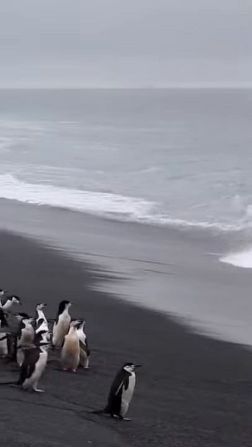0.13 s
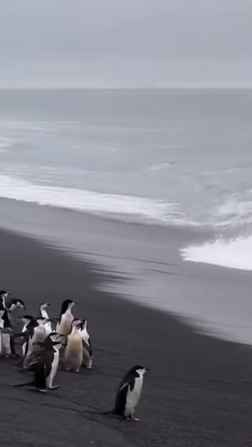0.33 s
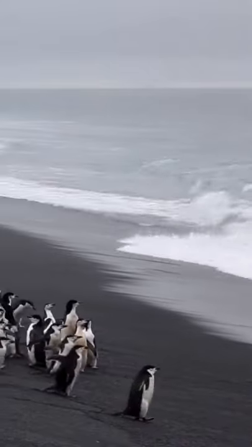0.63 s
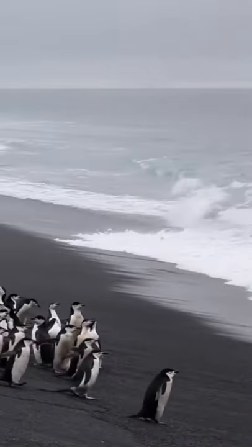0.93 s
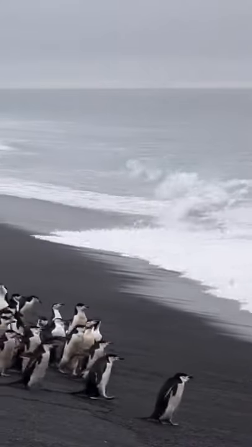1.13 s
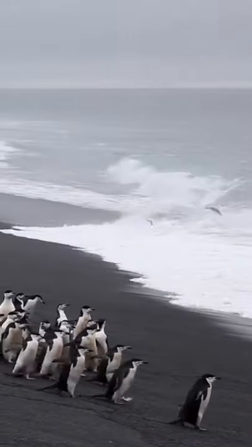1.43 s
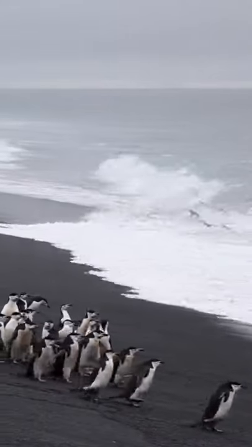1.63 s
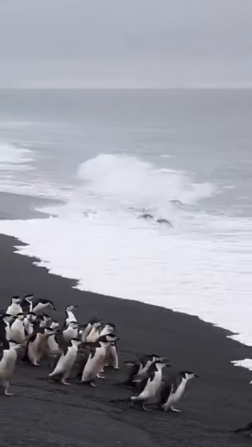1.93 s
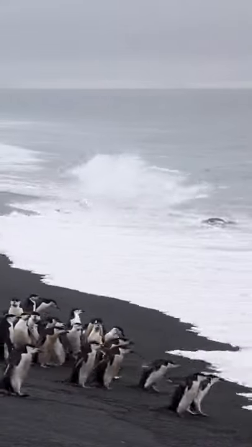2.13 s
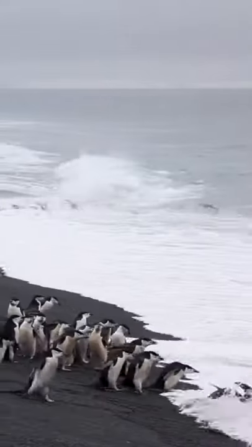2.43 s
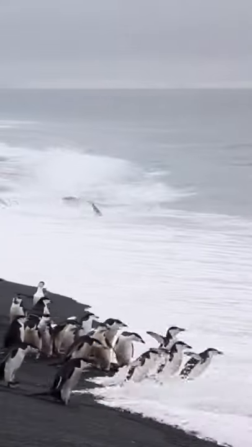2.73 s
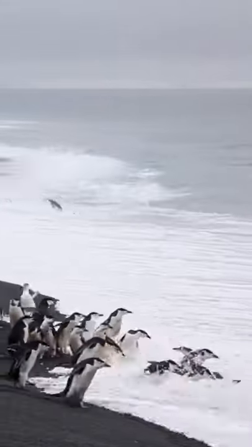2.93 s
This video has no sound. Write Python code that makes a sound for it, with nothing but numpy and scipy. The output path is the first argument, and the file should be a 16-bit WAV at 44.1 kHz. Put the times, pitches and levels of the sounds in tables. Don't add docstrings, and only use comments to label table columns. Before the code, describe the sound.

Surf on an open beach cuts in abruptly at 0.13 s: close, bubbly foam hiss over a farther roar that swells near 0.8 s, again from 1.75 s, peaks around 2.3 s and fades by 2.8 s. Wind flutters and thumps the small microphone, hardest near 0.5, 1.0 and 1.65 s. Faint penguin peeps and squawks come at 0.3-0.9 s, then 2.6 and 2.9 s. Brief spray hisses recur.

```python
import sys
import numpy as np
from scipy import signal
from scipy.fft import rfft, irfft
from scipy.io import wavfile
from scipy.ndimage import uniform_filter1d, map_coordinates

SR = 44100
rng = np.random.default_rng(int(sys.argv[2]) if len(sys.argv) > 2 else 0)


def magnitude_from_level(level_db):
    exponent = np.asarray(level_db, float) / 20
    return 10 ** exponent


def wav_out(sig):
    wavfile.write(sys.argv[1], SR, np.round(np.clip(np.atleast_2d(sig).T, -1, 1) * 32767).astype(np.int16))


N = 136269

# t/s, level/dB, spray brightness/dB
FOAM_COURSE = [(0.14, -26.5, 3), (0.33, -25.5, -31), (0.36, -24.5, -3.5), (0.45, -28, 4), (0.5, -28, -3),
               (0.56, -27.5, -4), (0.6, -26.5, -15), (0.64, -23.5, -6), (0.71, -27, -6), (0.89, -22.5, -17),
               (1.05, -27, -3), (1.42, -23, 1), (1.87, -28, 6), (2.26, -23.5, 4), (2.86, -29, 6.5),
               (2.88, -26, 2.5), (2.98, -29, 4.5), (3.08, -29, 6.5)]
# f/Hz, density/dB
FOAM_SPECTRUM = [(150, -31), (450, -6.5), (900, -4.5), (2000, 1), (2950, -2), (3950, 0), (4500, -3.5),
                 (6300, -6.5), (8000, -20.5), (10000, -33), (13000, -59)]
BUBBLE_HZ, BUBBLE_SPREAD, BUBBLE_CYCLES, BUBBLE_DB = 3486, .5, 14.5, -10.5
SPRAY_HZ, SPRAY_DB = 6170, -13.5

# t/s, level/dB
WAVE_COURSE = [(.3, -37.5), (.58, -35.5), (.78, -25), (1.0, -27), (1.08, -30.5), (1.4, -28.5), (1.5, -29.5),
               (1.75, -25), (1.85, -25.5), (2.05, -26.5), (2.23, -26), (2.34, -20.5), (2.44, -25.5),
               (2.54, -25), (2.65, -27), (2.8, -35), (3.0, -40.5), (3.08, -30.5)]
# f/Hz, density/dB
ROAR_SPECTRUM = [(50, -40), (120, -9), (250, -6.5), (450, -1), (800, -5.5), (1300, -11.5), (2500, -25),
                 (5000, -70)]
# f/Hz, density/dB
CREST_SPECTRUM = [(350, -42), (750, 3), (1100, 7.5), (1450, -4), (2200, -32.5)]
CREST_DB, CREST_GROWS = -35, 2.36

# t/s, level/dB
WIND_COURSE = [(0.15, -36.5), (.22, -31), (0.37, -34), (0.56, -29), (.62, -36.5), (0.77, -34.5),
               (0.93, -34), (1.1, -35.5), (1.26, -34.5), (1.35, -28.5), (1.5, -33.5), (1.7, -32),
               (1.97, -35.5), (2.07, -24), (2.4, -35.5), (2.8, -30), (2.91, -39), (2.96, -29.5),
               (3.04, -46)]
# f/Hz, density/dB
FLUTTER_SPECTRUM = [(15, -42), (30, -4), (60, -5), (110, -1), (200, 0.5), (350, -10.5), (600, -36),
                    (1200, -42.5)]
# t/s, peak level/dB, f/Hz, width/s
HARD_EDDIES = [(0.235, -9, 253, 0.0044), (0.458, -15, 170, 0.0065), (0.4705, -3, 384, 0.0044),
               (0.479, -10, 160, 0.003), (0.49, -12, 470, 0.003), (0.505, -4.5, 166, 0.0022),
               (0.555, -8.5, 171, 0.0078), (0.79, -11, 584, 0.0042), (0.977, -5, 192, 0.0044),
               (1.006, -11, 404, 0.0049), (1.015, -11, 242, 0.0046), (1.026, -3.5, 446, 0.0041),
               (1.036, 0, 241, 0.0031), (1.539, -8, 190, 0.0034), (1.631, -5.5, 201, 0.0042),
               (1.641, -7, 290, 0.0072), (1.646, -2.5, 342, 0.0024), (1.701, -15, 270, 0.0076),
               (1.752, -7, 860, 0.0038), (2.092, -14, 310, 0.0014), (2.264, -12, 444, 0.0051),
               (2.294, -25, 480, 0.004), (2.344, -19.5, 716, 0.014), (2.47, -14, 287, 0.003),
               (2.514, -7, 440, 0.0044), (2.537, -8, 409, 0.0018), (2.547, -5, 560, 0.0011),
               (2.654, -13, 296, 0.0036), (3.06, -25, 1030, 0.0061), (3.08, -7, 190, 0.0047)]
# t/s, peak level/dB, f/Hz
SOFT_EDDIES = [(0.171, -16.5, 147), (0.214, -16, 146), (0.259, -15.5, 161), (0.28, -26, 124),
               (0.292, -17, 142), (0.324, -15.5, 139), (0.339, -17, 160), (0.357, -19, 139),
               (0.371, -16, 142), (0.491, -7, 124), (0.568, -20.2, 156), (0.965, -19, 187),
               (0.999, -8, 248), (1.049, -17, 167), (1.074, -22, 105), (1.129, -19, 172), (1.332, -18, 223),
               (1.439, -26, 169), (1.561, -20, 160), (1.577, -21, 142), (1.618, -17, 137),
               (1.657, -24, 114), (1.687, -25, 151), (1.715, -16, 196), (1.744, -17, 167),
               (1.779, -23.9, 124), (1.804, -21, 202), (1.829, -25, 191), (2.012, -14, 131),
               (2.024, -12, 127), (2.046, -13.7, 111), (2.063, -20.6, 183), (2.104, -19, 88),
               (2.128, -21, 171), (2.164, -25, 178), (2.221, -32, 188), (2.26, -19, 200), (2.281, -28, 196),
               (2.294, -18, 153), (2.308, -26, 183), (2.325, -23.1, 206), (2.381, -13, 195),
               (2.401, -14, 192), (2.429, -18, 213), (2.469, -15, 139), (2.483, -15, 147),
               (2.498, -22.9, 194), (2.513, -23, 174), (2.53, -11, 173), (2.591, -17, 120),
               (2.618, -17, 222), (2.63, -23, 181), (2.653, -21, 154), (2.669, -24, 129),
               (2.744, -14.5, 229), (2.766, -23.5, 123), (2.797, -13.5, 127), (2.837, -22, 141),
               (2.956, -18.5, 178), (2.967, -21, 125)]
SOFT_TURNS = 0.99
EDGE_DB, EDGE_RATIO = -14, 2.11
PUSH_DB, PUSH_HZ = -15.5, 103

# start t/s, length/s, first f/Hz, last f/Hz, level/dB
PEEP_CALLS = [(.298, .045, 3760, 3860, -29.5), (.335, .025, 3820, 3600, -30), (.33, .03, 1800, 1750, -27.5),
              (.352, .12, 2600, 1985, -27), (.365, .036, 5480, 5330, -26.5), (.35, .03, 5050, 4650, -30),
              (.405, .03, 4600, 4450, -32.5), (.535, .04, 5150, 5050, -30), (.555, .02, 3700, 3400, -29),
              (.61, .025, 2600, 2500, -30), (.625, .025, 3650, 3550, -28), (.645, .03, 5300, 5280, -32),
              (.665, .047, 2300, 1930, -30.5), (.8, .03, 3750, 3800, -33), (.86, .038, 2630, 2590, -29),
              (2.56, .03, 5500, 5450, -29), (2.865, .025, 3500, 3400, -32), (2.875, .03, 2500, 2250, -33),
              (2.9, .025, 5280, 5180, -27.5)]
GLIDE, WARBLE = .29, .005
# start t/s, length/s, level/dB
SQUAWK_CALLS = [
    (0.342, 0.14, -27),
    (0.531, 0.063, -26.5),
    (0.612, 0.062, -41),
    (2.573, 0.11, -34),
    (2.855, .05, -49),
]
# f/Hz, density/dB
THROAT_SPECTRUM = [(1200, -44), (2300, 6), (3000, 10), (3600, 11), (5300, 10), (6800, -8), (9000, -50)]

# t/s, length/s, level/dB, f/Hz
SPRAY_BURSTS = [(.44, 0.057, -31.5, 6000), (.73, .03, -33, 6100), (.85, 0.024, -45, 5200),
                (1.314, 0.048, -29, 5300), (1.375, 0.025, -36, 5500), (1.451, .07, -31, 5500),
                (1.534, 0.054, -28.5, 5650), (1.84, 0.046, -36, 5800), (1.96, .03, -29.5, 5700),
                (2.123, .03, -28, 5330), (2.306, 0.082, -32, 5750), (2.389, 0.052, -27.5, 5500),
                (2.593, 0.1, -28.5, 5700), (2.699, 0.032, -31, 5860), (2.78, 0.03, -34, 3700),
                (2.887, 0.044, -32, 5270)]
BURST_WIDTH = 0.13

START_S = .1291
# f/Hz, share of patches
REFILL_SHARE = [(4200, 0.39), (4800, 0.81), (8500, 1), (10500, 0.83), (12800, 0.8)]
REFILL_HZ = 4130
KEPT, SKIPPED = 0.62, .08


def unit(x):
    return x / np.sqrt(np.mean(x ** 2) + 1e-20)


def along(points, hz):
    f, v = np.transpose(points)
    return np.interp(np.log(hz + 1), np.log(f + 1), v)


def curves(rows):
    s, *columns = np.transpose(rows)
    t = np.arange(N) / SR
    return [np.interp(t, s, column) for column in columns]


def wobble(rate):
    knots = rng.standard_normal(N // 100)
    return map_coordinates(knots, [np.arange(N) * rate / SR])


def rush(spectrum, patchy_db, size):
    z = signal.stft(rng.standard_normal(N + SR), nperseg=512)[2]
    field = uniform_filter1d(rng.standard_normal(z.shape), size[0], 0)
    field = uniform_filter1d(field, size[1], 1)
    x = signal.istft(z * magnitude_from_level(patchy_db * unit(field)), nperseg=512)[1]
    colour = magnitude_from_level(along(spectrum, np.fft.rfftfreq(len(x), 1 / SR)))
    return unit(irfft(rfft(x) * colour, len(x))[:N])


def grains(count, hz, spread, cycles, rise, swing_db):
    u = rng.random((count, 2))
    g = rng.standard_normal(count)
    t = np.arange(700) / SR
    f = np.clip(hz * np.exp(spread * g), 300, 6800)[:, None]
    v = t * f / cycles
    ring = np.sin(2 * np.pi * f * t * (1 + rise * v))
    rows = magnitude_from_level(-swing_db * np.log(u[:, 1:])) * v * np.exp(-3 * v) * ring
    at = (u[:, :1] * N).astype(int) + np.arange(len(t))
    return unit(np.bincount(at.ravel(), rows.ravel())[:N])


def foam():
    level_db, bright_db = curves(FOAM_COURSE)
    hiss = rush(FOAM_SPECTRUM, patchy_db=0.83, size=(9, 10)) * magnitude_from_level(0.84 * wobble(9.43))
    bubbles = grains(count=2500, hz=BUBBLE_HZ, spread=BUBBLE_SPREAD, cycles=BUBBLE_CYCLES,
                     rise=0.0884, swing_db=-0.5)
    spray_spectrum = [(4000, -25), (SPRAY_HZ, 0), (8300, -11), (10500, -24), (13500, -33)]
    spray = rush(spray_spectrum, patchy_db=3.0, size=(8, 9))
    spray_gain = magnitude_from_level(SPRAY_DB + bright_db + 1.46 * wobble(16))
    return magnitude_from_level(level_db - 0.58) * (hiss + magnitude_from_level(BUBBLE_DB) * bubbles + spray_gain * spray)


def breaker():
    level_db, = curves(WAVE_COURSE)
    lumpy = unit(rush(ROAR_SPECTRUM, patchy_db=1.5, size=(4, 6)) * magnitude_from_level(1.2 * wobble(30)))
    body = magnitude_from_level(level_db + .1) * lumpy
    crest_gain = magnitude_from_level(CREST_DB + CREST_GROWS * (level_db + 23.5))
    return body + crest_gain * rush(CREST_SPECTRUM, patchy_db=2.0, size=(4, 6))


def wind():
    level_db, = curves(WIND_COURSE)
    gusts = magnitude_from_level(2.8 * wobble(45) + 1.2 * wobble(14))
    flutter = unit(rush(FLUTTER_SPECTRUM, patchy_db=1.5, size=(2, 4)) * gusts)
    out = magnitude_from_level(level_db + .5) * flutter
    t = np.arange(N) / SR
    eddies = list(HARD_EDDIES) + [(s, db, hz, SOFT_TURNS / hz) for s, db, hz in SOFT_EDDIES]
    turns = rng.normal(0.44, 0.21, (len(eddies), 2))
    for (s, db, hz, width), turn in zip(eddies, turns):
        near = slice(int((s - .03) * SR), int((s + .03) * SR))
        d = t[near] - s
        swing = np.cos(2 * np.pi * (hz * d + turn[0]))
        edge = np.cos(2 * np.pi * (EDGE_RATIO * hz * d + turn[1]))
        strike = np.exp(-np.abs(d / (0.54 * width)) ** 2.77)
        out[near] += magnitude_from_level(db - 3.2) * strike * (swing + magnitude_from_level(EDGE_DB) * edge)
        push = np.exp(-(d * PUSH_HZ * 2.8) ** 2) * np.cos(2 * np.pi * (PUSH_HZ * d + turn[0]))
        out[near] += magnitude_from_level(db + PUSH_DB) * min(1, 300 / hz) * push
    return out


def peeps():
    out = np.zeros(N)
    shake = 1 + WARBLE * wobble(120)
    flicker = unit(1 + .2 * wobble(120))
    for s, length, first_hz, last_hz, db in PEEP_CALLS:
        u = np.linspace(0, 1, int(length * SR))
        at = slice(int(s * SR), int(s * SR) + len(u))
        hz = (last_hz + (first_hz - last_hz) * np.exp(-(u / GLIDE) ** 2)) * shake[at]
        swell = magnitude_from_level(db + 2.5 - 2 * u) * np.sin(np.pi * u) ** .3 * flicker[at]
        out[at] += swell * np.sin(2 * np.pi * np.cumsum(hz) / SR)
    return out


def squawks():
    t = np.arange(N) / SR
    gate = np.zeros(N)
    for s, length, db in SQUAWK_CALLS:
        opening, closing = (t - s) / 0.0041, (s + length - t) / 0.03
        gate += magnitude_from_level(db) * np.clip(np.minimum(opening, closing), 0, 1)
    return gate * rush(THROAT_SPECTRUM, patchy_db=2.5, size=(3, 6))


def bursts():
    out = np.zeros(N)
    t = np.arange(SR // 4) / SR - .125
    f = np.fft.rfftfreq(len(t), 1 / SR) + 1
    noises = rng.standard_normal((len(SPRAY_BURSTS), len(t)))
    for (s, length, db, hz), noise in zip(SPRAY_BURSTS, noises):
        band = np.exp(-(np.log(f / hz) / BURST_WIDTH) ** 2 / 2)
        hiss = unit(irfft(rfft(noise) * band, len(t)))
        start = int((s + t[0]) * SR)
        out[start:][:len(t)] += magnitude_from_level(db) * np.exp(-(2 * t / length) ** 2) * hiss
    return out


def scene():
    mono = foam() + breaker() + wind() + peeps() + squawks() + bursts()
    return np.tile(mono, (2, 1))


def refill(x):
    hz, t, z = signal.stft(x, SR, nperseg=1024)
    band = (np.log(hz + 1) * 11).astype(int)
    step = np.arange(len(t)) // 3
    draw = rng.random((band.max() + 1, step.max() + 1))[band][:, step]
    swap = (draw < along(REFILL_SHARE, hz)[:, None]) & (hz > REFILL_HZ)[:, None]
    swap &= rng.random(len(t)) > SKIPPED
    noise = signal.stft(rng.standard_normal(x.shape), SR, nperseg=1024)[2]
    power = uniform_filter1d(np.abs(z) ** 2, size=5, axis=1)
    level = np.sqrt(np.abs(uniform_filter1d(power, size=2, axis=2)))
    fresh = KEPT * z + 0.99 * level * noise / np.sqrt(np.mean(np.abs(noise) ** 2))
    return signal.istft(np.where(swap, fresh, z), SR, nperseg=1024)[1][:, :N]


def low_pass(x):
    return signal.sosfilt(signal.butter(12, 12970, fs=SR, output="sos"), x)


def record(dry):
    thin = signal.sosfilt(signal.butter(2, 42, "high", fs=SR, output="sos"), dry)
    started = np.arange(N) >= START_S * SR
    return low_pass(refill(thin) * started)


dry = scene()
out = record(dry)
wav_out(out)
```